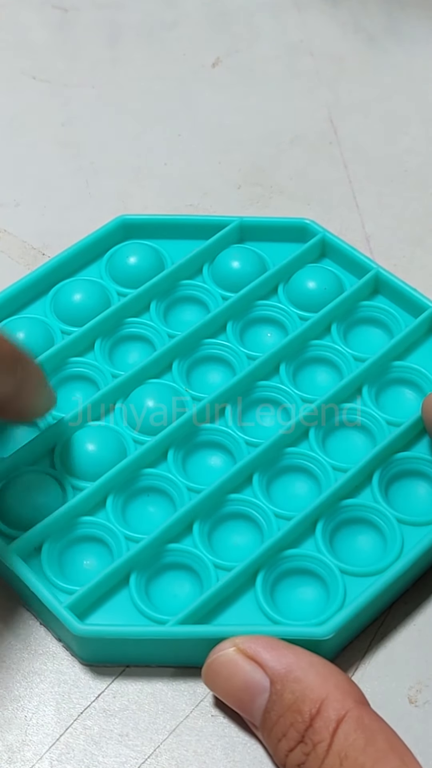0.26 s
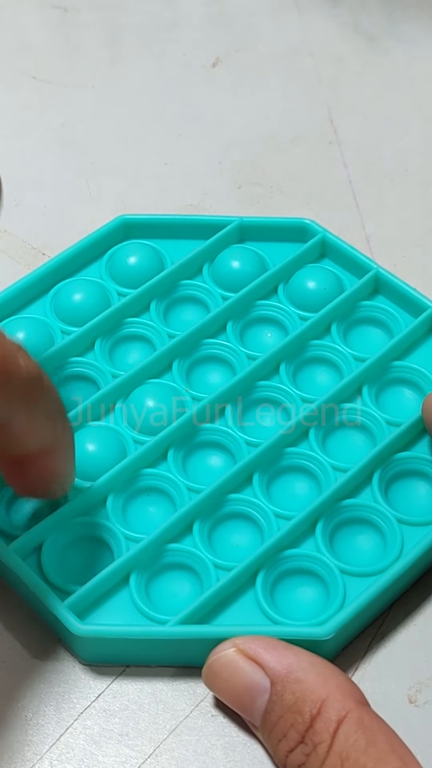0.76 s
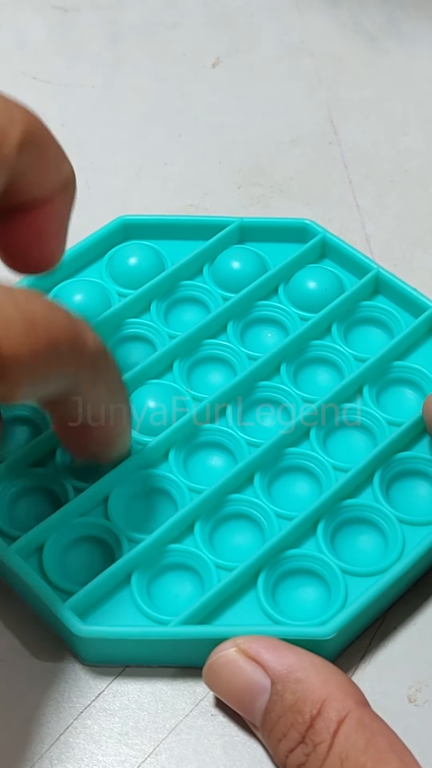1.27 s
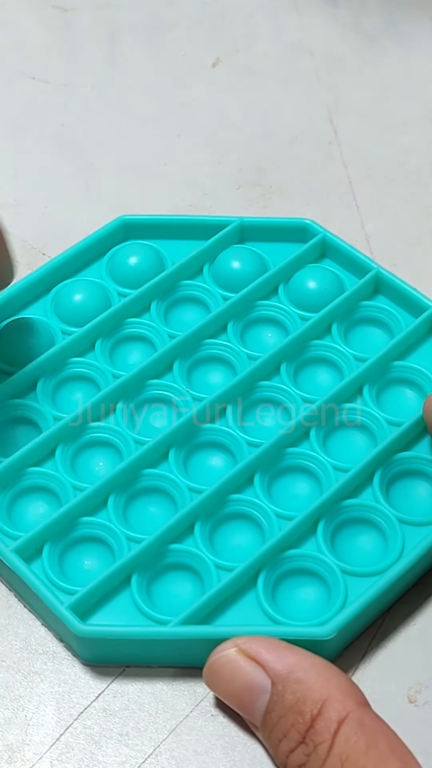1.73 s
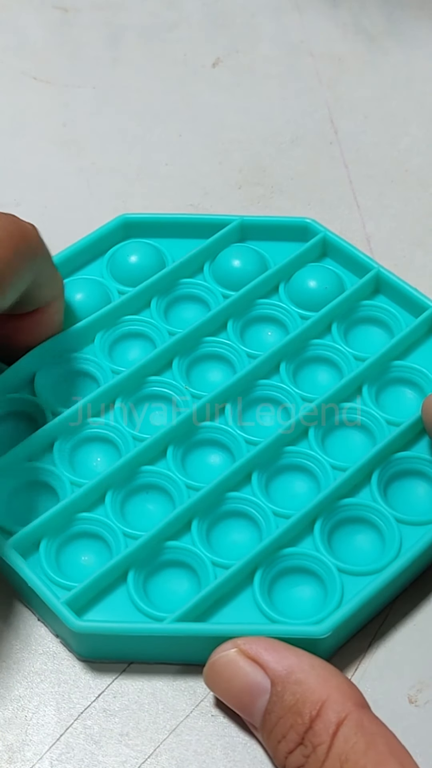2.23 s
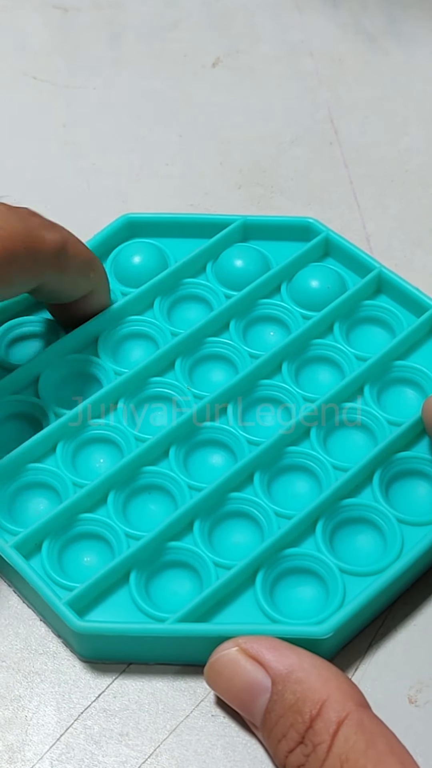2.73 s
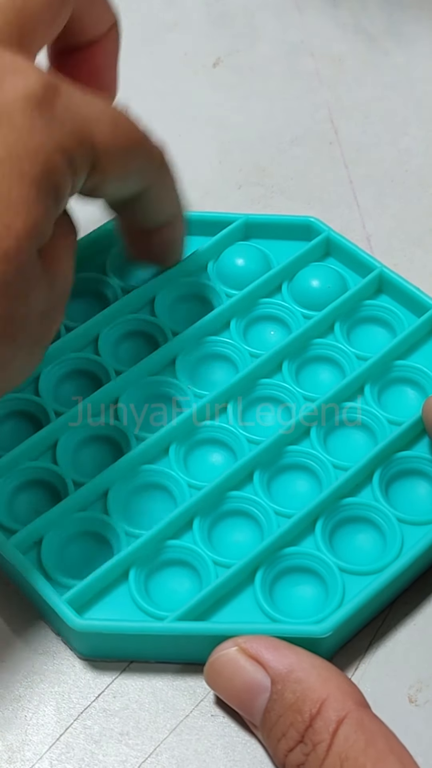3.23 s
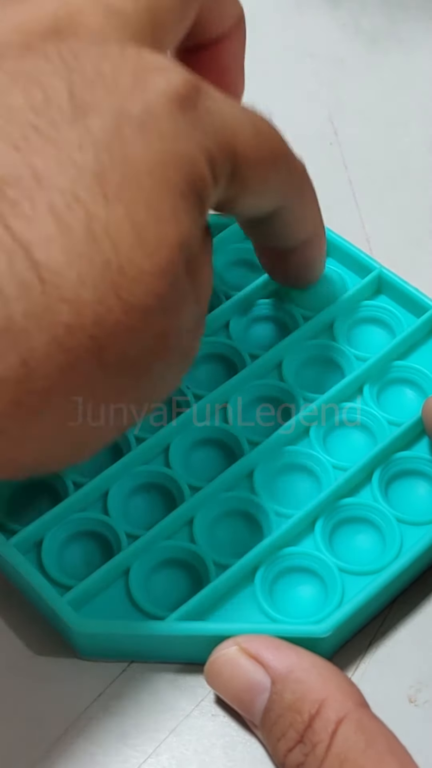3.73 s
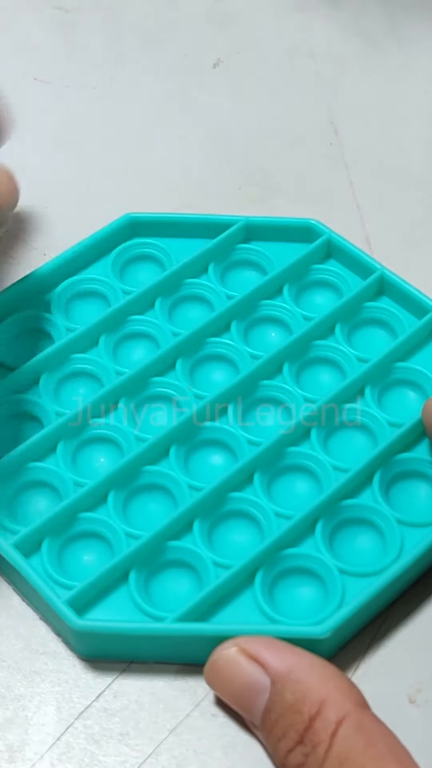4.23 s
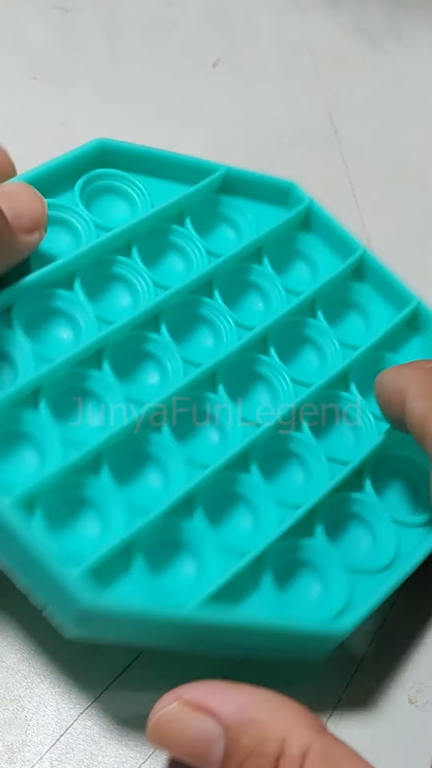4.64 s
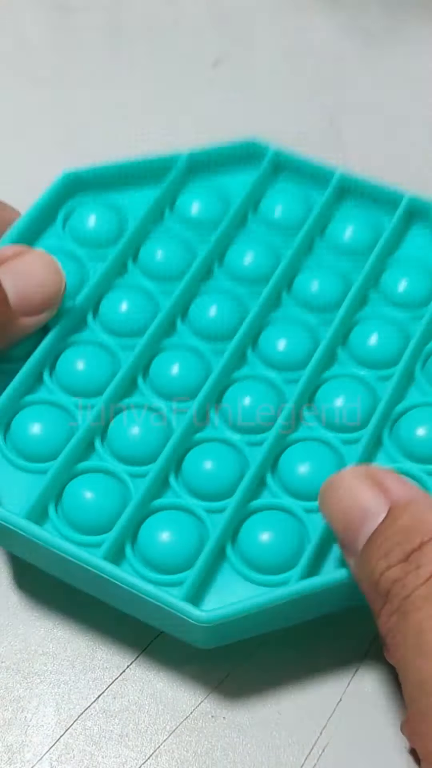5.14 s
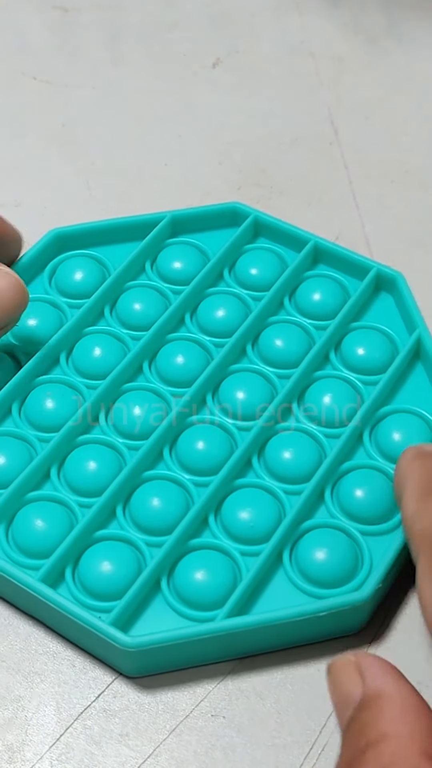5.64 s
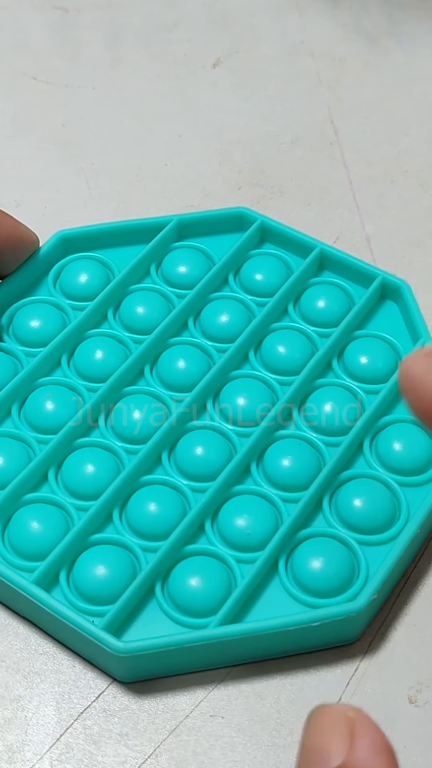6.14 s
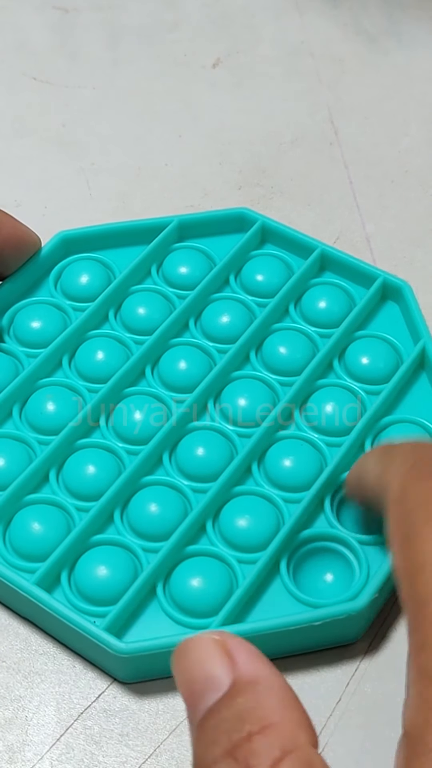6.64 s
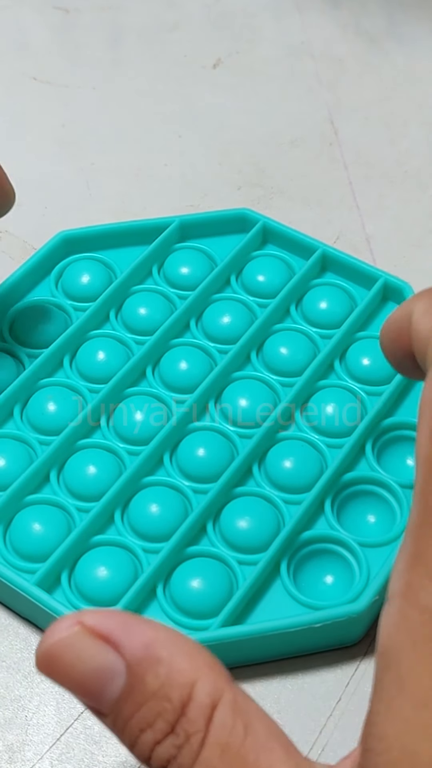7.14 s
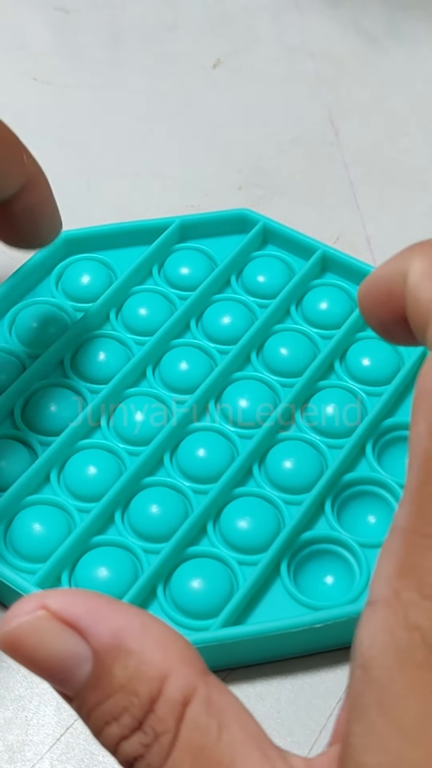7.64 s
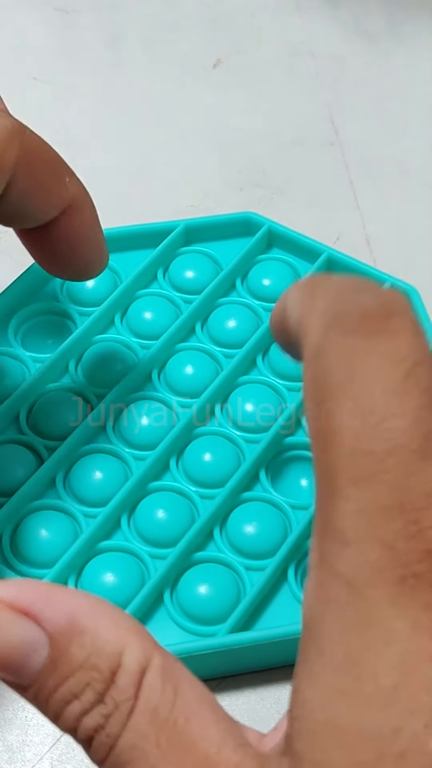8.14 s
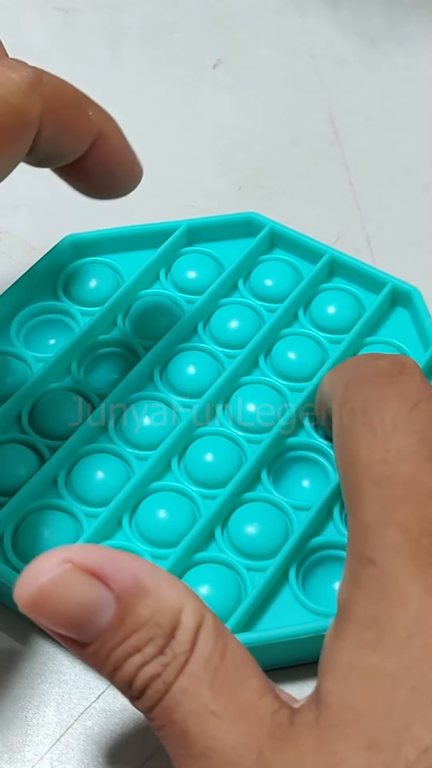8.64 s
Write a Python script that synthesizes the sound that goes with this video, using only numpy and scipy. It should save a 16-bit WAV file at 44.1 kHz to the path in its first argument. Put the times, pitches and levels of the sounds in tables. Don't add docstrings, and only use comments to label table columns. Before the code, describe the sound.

A silicone bubble mat is pressed close to a stereo microphone on a table in a small room. From 0.2 to 1.6 s come soft, hollow dome presses, the clearest near 0.26 and 0.57; more follow from 2.8 to 3.9, strongest at 2.8. At 4.56 the rubber peels off the table with a small rip, rustles and ticks at 4.8, then lands with a thud and clack at 5.63. Much louder pops begin at 6.49, then 6.8 and 7.04, each a hollow knock with a bright snap and brief rough ring. Weaker pops at 7.58 and 8.19 mix with firmer ones at 7.93, 8.36, 8.58 and 8.84. A palm rubs faintly around 7.1-7.6. Underneath, a low motor hum beats with an idling engine; faint traffic grows nearer after 6 s, with thin insect hiss, distant bird chirps and faint tyre whines.

```python
import sys
import numpy as np
from scipy import signal
from scipy.fft import rfft, irfft, next_fast_len
from scipy.io import wavfile
from scipy.ndimage import uniform_filter1d

SR = 44100
rng = np.random.default_rng(int(sys.argv[2]) if len(sys.argv) > 2 else 0)


def persist_wave(psi):
    counts = np.round(np.clip(psi, -1, 1) * 32767).astype(np.int16)
    wavfile.write(sys.argv[1], SR, np.atleast_2d(counts).T)


def natural_amplitude(level_db):
    exponent = np.asarray(level_db, float) / 20
    return 10 ** exponent


N = 392049
T = np.arange(N) / SR
FAR_SIDE_S = 7.3


def rms_one(x):
    return x / np.sqrt(np.mean(x ** 2) + 1e-20)


def in_time(rows):
    s, *columns = np.transpose(rows)
    return [np.interp(T, s, c) for c in columns]


def at_hz(points, hz):
    known_hz, value = np.transpose(points)
    return np.interp(np.log(hz), np.log(known_hz), value)


def drift(rate):
    return np.interp(T * rate, np.arange(400), 1.2 * rng.standard_normal(400))


def decay(t, t60):
    return natural_amplitude(-60 * t / np.clip(t60, .002, 2))


def add(out, s, burst):
    i = max(round(s * SR), 0)
    out[..., i:i + burst.shape[-1]] += burst[..., :N - i]


def resonance(x, hz, width_hz):
    r = np.exp(-np.pi * width_hz / SR)
    top = np.array([1, 0, -1]) * (1 - r * r) / 2
    return signal.lfilter(top, [1, -2 * r * np.cos(2 * np.pi * hz / SR), r * r], x)


def knock(out, s, db, hz, pan_db, rise_ms, t60):
    t = np.arange(-300, round(np.clip(t60, .002, .1) * SR)) / SR
    swell = np.exp(-np.log(2) * (1000 * t / max(rise_ms, .2)) ** 2)
    shape = np.where(t < 0, swell, decay(t, t60))
    share = 2 / (1 + natural_amplitude([[-pan_db], [pan_db]]))
    add(out, s + t[0], natural_amplitude(db) * share * shape * np.cos(2 * np.pi * hz * t + 2.53))


def rattle(rows, db, t60, low_hz, high_hz):
    out, t = np.zeros((2, N)), np.arange(3000) / SR
    creak_s = .004
    for row, (both, own) in zip(rows, rng.standard_normal((len(rows), 2, 3000))):
        shape = decay(np.maximum(t - creak_s, 0), t60) * np.minimum(t / creak_s, 1) ** 3
        ports = np.array([1.68 * both, 0.82 * both + .5 * own])
        add(out, row[0] - creak_s, natural_amplitude(row[1] + db) * shape * ports)
    band = signal.butter(4, [low_hz, high_hz], "band", fs=SR, output="sos")
    return signal.sosfilt(band, out + 1e-18)


def streak(hz, width_hz):
    knots = rng.standard_normal((2, 2, 3000))
    at = np.arange(len(hz)) * width_hz / SR
    slow = np.array([[np.interp(at, np.arange(3000), k) for k in pair] for pair in knots])
    turn = 2 * np.pi * np.cumsum(hz) / SR
    return rms_one(slow[0] * np.cos(turn) + slow[1] * np.sin(turn))


def streaks(rows):
    out = np.zeros((2, N))
    for s, length, from_hz, to_hz, width_hz, db in rows:
        hz = np.linspace(from_hz, to_hz, round(length * SR))
        shape = np.hanning(len(hz)) ** 0.17
        add(out, s, natural_amplitude(db + 1.0) * shape * streak(hz, 1.8 * width_hz) * natural_amplitude([[2.5], [-2.5]]))
    return out * natural_amplitude(2.5 * drift(30))


# (peak time [s], peak level [dB], pitch [Hz], left-right [dB])
PRESSES = [(0.1946, -50, 710, 8), (0.2636, -28, 940, 6), (0.4335, -41, 727, 2), (0.4498, -52, 680, 1),
           (0.5692, -28.5, 740, 4), (0.5865, -35.5, 600, 2), (0.9468, -47.5, 726, 9), (1.212, -49, 800, 8),
           (1.2507, -46, 770, 4), (1.5807, -35.5, 866, -2), (2.8347, -24.5, 780, 0), (2.855, -44, 820, 2),
           (3.2118, -30, 833, 0), (3.2485, -38, 776, -1), (3.4111, -48.5, 563, -4), (3.5691, -37, 632, 1),
           (3.76, -46.5, 530, 11), (3.9076, -43, 683, 3)]
# (peak time [s], peak level [dB], pitch [Hz], left-right [dB])
HANDLING = [
    (4.5597, -46, 890, 10),
    (4.8252, -39.5, 970, 14),
    (4.85, -56.5, 960, 3),
    (5.4588, -45, 540, 10),
    (5.6288, -20, 650, 5),
    (5.6305, -20, 940, 3),
]
# (peak time [s], peak level [dB], pitch [Hz], left-right [dB], ring to -60 dB [cycles])
FLIPS = [(6.463, -24.5, 730, -2, 7), (6.4865, -7, 944, -2, 15), (6.775, -33, 800, 6, 12),
         (6.7842, -24.5, 720, 4, 10), (6.7995, -7, 900, 2, 8), (7.0311, -19, 1080, 6, 8.5),
         (7.0362, -12, 1170, 5, 5.7), (7.0428, -14, 887, 0.5, 9.8), (7.5838, -28.5, 880, 4, 8.8),
         (7.9011, -24, 660, 1, 7.3), (7.9282, -19, 1050, 3.5, 6), (8.1852, -25, 813, 4, 8.5),
         (8.3557, -9, 860, -1.5, 4.6), (8.5452, -31, 860, -2, 13), (8.5798, -9.5, 1092, 3.5, 9),
         (8.7709, -20, 920, 2, 7), (8.7878, -26, 790, 0, 4.7), (8.8376, -8.5, 820, 3, 8)]
# (peak time [s], peak level [dB],
# pitch [Hz])
REBOUNDS = [(.2695, -40, 900), (6.4835, -26, 1300), (6.511, -27, 1100), (6.7715, -36, 850),
            (.625, -46, 750), (6.8565, -32, 750), (7.0285, -33, 900), (7.079, -34, 700),
            (7.9012, -30, 1000), (8.862, -27, 1000), (8.1862, -34, 480), (8.1853, -34, 1680),
            (8.8378, -27, 3100), (7.0425, -24, 4150), (6.7995, -27, 4800)]


def domes():
    out = rattle(PRESSES, -7.0, 0.05, 392, 1120) + rattle(HANDLING + FLIPS, -12.0, 0.035, 390, 1300)
    lying = [row + (8.2,) for row in PRESSES]
    held = [row + (5.0,) for row in HANDLING]
    for s, db, hz, pan_db, cycles in lying + held + FLIPS:
        rise_ms = 0.55 - 0.03 * db
        knock(out, s, db, hz, pan_db, rise_ms, cycles / hz)
    for s, db, hz in REBOUNDS:
        knock(out, s, db, hz, 2.0, 0.9, 5.0 / hz)
    return out


# (peak time [s], peak level [dB], pitch [Hz], left-right [dB])
CLACKS = [(2.8335, -49, 1520, 3), (3.2114, -43, 1900, 3), (3.2478, -50, 1900, 3), (4.56, -43, 1540, 11),
          (4.5652, -47, 2600, 9), (4.57, -41, 2300, 6), (5.6294, -27, 1400, 6), (5.64, -34, 1460, -3),
          (6.4867, -16, 1400, -12), (6.773, -46, 2600, -8), (6.7824, -26.5, 1600, -1),
          (6.7992, -17, 1480, -4), (7.0347, -21.5, 1480, 1), (7.0428, -15, 1570, -2),
          (7.9271, -14, 1840, 2), (8.1852, -42, 1680, -3), (8.2, -48, 1610, -5), (8.3556, -17, 1330, -3),
          (8.58, -18, 1390, 3), (8.7695, -44, 1580, -9), (8.8367, -12.5, 1475, 0)]


def clacks():
    out = rattle(CLACKS, -4.5, 0.032, 980, 2475) + rattle(CLACKS, -13.0, 0.024, 3400, 5400)
    for s, db, hz, pan_db in CLACKS:
        knock(out, s, db + 1.0, hz, pan_db, 0.36, 0.014 * (1500 / hz) ** 3.5)
    return out


# (time [s], peak level [dB])
THUDS = [(0.567, -37), (2.831, -48), (3.22, -47.5), (4.556, -52), (4.824, -48.5), (5.625, -28),
         (6.484, -37), (7.04, -31.5), (7.579, -34), (7.924, -43.5), (8.834, -46)]


def thuds():
    out = np.zeros((2, N))
    for s, db in THUDS:
        hz = 310 if s < FAR_SIDE_S else 470
        knock(out, s + 0.00416, db, hz, 2.5, 1.4, 0.034)
    return out


def nearer_left(x):
    lag_s = .00012
    return np.array([x[0], np.roll(x[1], round(lag_s * SR))])


# (peak time [s], peak level [dB], pitch [Hz])
PEELS = [(0.264, -41, 7060), (0.9493, -65, 5880), (1.579, -54, 5850), (2.8341, -56, 4950),
         (3.2134, -57, 5710), (4.5587, -35, 6200), (4.563, -37, 5600), (4.5675, -39, 5600),
         (5.6284, -31.5, 5930), (6.4605, -52, 7200), (6.4862, -22.5, 5540), (6.4945, -25, 5700),
         (6.7722, -52, 5220), (6.7827, -52, 5090), (6.799, -21.5, 5700), (7.034, -33, 6130),
         (7.042, -14, 5950), (7.9272, -23.5, 5700), (7.9346, -35, 5260), (8.184, -54, 6500),
         (8.3561, -23, 6400), (8.3627, -35, 6310), (8.5794, -23, 5250), (8.7692, -46, 6160),
         (8.8374, -13, 6050)]
# (pitch [Hz], width [Hz], level [dB])
PORTS = [
    [(5920, 1160, 1), (5060, 720, -1), (3520, 360, -4), (7750, 830, -33)],
    [(6500, 600, -14), (5200, 410, -12), (3500, 3600, -13), (8900, 930, -13.5)],
]


def snaps():
    ticks, crackle, t = np.zeros((2, N)), np.zeros((2, N)) + 1e-18, np.arange(2000) / SR
    grit = rng.standard_normal((len(PEELS), 2, 2000))
    for (s, db, hz), noise in zip(PEELS, grit):
        t60 = 0.0035 - 0.00011 * db
        rip = 4.5 < s < 4.6
        knock(ticks, s, db - 1.0 - 9 * rip, hz, 15, 0.27, 1.25 * t60)
        held_s = .005 * rip
        shape = decay(np.maximum(t - held_s, 0), 2.3 * t60) * np.minimum(t / 0.00046, 1)
        add(crackle, s - .0008, natural_amplitude(db + 10.0) * noise * shape)
    ported = []
    for side, port in zip(crackle, PORTS):
        peaks = [natural_amplitude(db) * resonance(resonance(side, hz, width), hz, width) for hz, width, db in port]
        ported.append(sum(peaks))
    return ticks + ported


# (time
# [s], pitch [Hz], width [Hz], level [dB], length [s])
LINGERINGS = [(.264, 1050, 1000, -52, .055), (.434, 730, 350, -62, .04), (.569, 620, 620, -43, .075),
              (.569, 1700, 1400, -66, .012), (1.581, 780, 400, -57, .035), (2.835, 700, 750, -45, .06),
              (2.835, 1600, 1400, -59, .025), (3.212, 720, 700, -48, .065), (3.212, 1700, 1500, -57, .04),
              (3.567, 720, 600, -55, .035), (4.562, 800, 800, -58, .03), (4.562, 1600, 800, -54, .07),
              (4.825, 900, 500, -57, .045), (5.629, 550, 800, -39, .085), (5.629, 1550, 1400, -45, .07),
              (6.459, 800, 700, -42, .03), (6.487, 440, 210, -41, .09), (6.487, 930, 600, -31, .12),
              (6.487, 1450, 500, -38, .11), (6.8, 820, 510, -37, .115), (6.8, 1400, 800, -42, .1),
              (7.043, 450, 220, -43, .065), (7.043, 760, 360, -39, .115), (7.043, 1400, 800, -39, .1),
              (7.584, 560, 450, -43, .085), (7.584, 950, 500, -49, .045), (7.901, 550, 360, -40, .03),
              (7.901, 980, 280, -44, .03), (7.928, 680, 750, -43, .055), (7.928, 1850, 700, -40, .09),
              (8.185, 880, 500, -44, .135), (8.195, 1620, 600, -55, .07), (8.356, 800, 400, -37, .1),
              (8.356, 1250, 700, -36, .085), (8.545, 860, 350, -52, .04), (8.58, 1200, 1000, -36, .11),
              (8.58, 700, 300, -45, .1), (8.771, 850, 1000, -38, .055), (8.838, 730, 400, -32, .08),
              (8.838, 1350, 900, -34, .08),
              (.264, 6600, 1600, -63, .06), (2.835, 3800, 500, -71, .06), (4.562, 2530, 1000, -54, .07),
          (4.562, 5600, 2200, -46, .085), (4.562, 4000, 800, -54, .08), (5.629, 5300, 2400, -52, .07),
          (5.625, 7900, 1400, -62, .06), (5.629, 3200, 2200, -54, .06), (6.487, 5500, 2000, -42, .08),
          (6.487, 2700, 1200, -52, .05), (6.8, 5600, 2200, -46, .07), (6.8, 3900, 1000, -52, .065),
          (6.8, 2500, 700, -54, .06), (7.043, 4190, 1200, -47, .06), (7.043, 5900, 1600, -46, .085),
          (7.043, 2400, 700, -52, .05), (7.928, 2350, 600, -44, .05), (7.928, 5900, 1640, -45, .07),
          (7.928, 3900, 1400, -53, .05), (8.356, 2250, 600, -50, .055), (8.356, 3950, 750, -51, .06),
          (8.356, 6400, 1500, -43, .09), (8.58, 2600, 1400, -49, .045), (8.58, 5400, 2600, -46, .065),
          (8.771, 6200, 1400, -60, .045), (8.838, 6100, 1500, -42, .08), (8.838, 3200, 1900, -43, .08),
              (.94, 680, 350, -61, .03),
    (1.21, 760, 500, -61, .022),
    (1.249, 770, 400, -58, .028),
    (3.408, 600, 350, -62, .025),
    (3.758, 780, 700, -59, .022),
    (3.905, 740, 450, -57, .03),
    (5.457, 750, 800, -60, .02),
]
# (frequency [Hz], left-right [dB])
PORT_LEAN = [(2000, 2.5), (5800, 10), (8200, -5)]


def linger():
    out, bins_hz = np.zeros((2, N)), np.fft.rfftfreq(8192, 1 / SR)
    for s, hz, width_hz, db, length in LINGERINGS:
        t = np.arange(round((length + .04) * SR)) / SR
        white = rfft(rng.standard_normal((2, 8192)))
        off = 2 * (bins_hz - hz) / width_hz
        wide = rms_one(irfft(white * np.exp(-.5 * off ** 4)))[:, :len(t)]
        core = rms_one(irfft(white * np.exp(-.5 * ((off + .3) / .62) ** 4)))[:, :len(t)]
        aged = np.minimum(t / length, 1)
        left, right = (1 - aged) * wide + aged * core
        alike = np.clip(0.85 - hz / 4000, 0, 1)
        ports = [left, alike * left + np.sqrt(1 - alike ** 2) * right]
        share = natural_amplitude(at_hz(PORT_LEAN, hz) / 2 * np.array([[1], [-1]]))
        share = share / np.sqrt(np.mean(share ** 2))
        shape = np.minimum(t / .005, 1) * decay(t, .26) * decay(np.maximum(t - length, 0), .05)
        add(out, s, natural_amplitude(db + 1.5) * shape * ports * share)
    return out


# (time [s], level [dB], spacing [Hz])
SLIDE = [
    (7.05, -79, 469),
    (7.18, -62.5, 462),
    (7.35, -61.5, 469.4),
    (7.52, -59.5, 472),
    (7.62, -87, 485),
]
# (multiple of spacing, width [Hz], level [dB])
SLIDE_RIDGES = [(1, 57, 1.5), (2, 170, -8), (3, 170, -8), (4, 150, -11.5), (5, 150, -13)]


def slide():
    out, start, end = np.zeros((2, N)), round(SLIDE[0][0] * SR), round(SLIDE[-1][0] * SR)
    db, spacing_hz = [c[start:end] for c in in_time(SLIDE)]
    ridges = sum(natural_amplitude(d) * streak(k * spacing_hz, width) for k, width, d in SLIDE_RIDGES)
    add(out, SLIDE[0][0], natural_amplitude(db) * ridges)
    return out


# (time [s], length [s], pitch [Hz], width [Hz], level [dB])
TURNING = [(4.763, .016, 5400, 600, -70), (4.518, .035, 5200, 450, -73), (4.78, .09, 5350, 450, -77),
           (4.83, .065, 6250, 250, -74), (4.89, .03, 6180, 400, -66), (4.933, .03, 6300, 350, -71),
           (4.943, .02, 4550, 400, -69), (5.017, .03, 5850, 400, -68), (5.197, .025, 5600, 700, -71),
           (5.0, .3, 7800, 450, -77)]


def turning():
    return streaks([(s, length, hz, hz, width, db) for s, length, hz, width, db in TURNING])


# (band centre [Hz], fall by 60 dB [s], level [dB])
ROOM = [(264, 0.22, -31), (540, 0.21, -38), (1080, 0.3, -45), (2050, 0.26, -46), (4300, 0.3, -44),
        (7900, 0.4, -48)]
# (delay [s], level [dB])
ECHOES = [
    (.0065, -26),
    (.013, -25),
    (.025, -28),
]


def room(x):
    t, noise = np.arange(SR // 4) / SR, rng.standard_normal((len(ROOM), 2, SR // 4))
    noise[:2, 1] = 0.69 * noise[:2, 0] + 0.74 * noise[:2, 1]
    tail = 0
    for (hz, t60, db), white in zip(ROOM, noise):
        octave = signal.butter(2, [hz / 2 ** .5, hz * 2 ** .5], "band", fs=SR, output="sos")
        gate_s = 0.105 * (1000 / hz) ** .25
        shape = decay(t, t60) * decay(np.maximum(t - gate_s, 0), 7.2 * 0.035)
        tail = tail + natural_amplitude(db) * signal.sosfilt(octave, white) * shape
    tail = tail * np.minimum(t / 0.0013, 1)
    for s, db in ECHOES:
        tail[:, round(s * SR)] += natural_amplitude(db)
    return signal.oaconvolve(x, tail, axes=1)[:, :N]


def hum(rows, orders, wobble_db):
    hz, db = in_time(rows)
    turn = 2 * np.pi * np.cumsum(hz) / SR
    out = 0
    for k, d in orders:
        level = natural_amplitude(db + 2 + d + wobble_db * drift(2.925))
        out = out + level * np.sin(k * turn + rng.uniform(0, 5.94))
    return out


# (time [s], level [dB])
MOTOR = [
    (0, -49),
    (.6, -43.5),
    (1.2, -54.5),
    (1.9, -46.5),
    (8.89, -46.5),
]
# (multiple of 57.9 Hz, level [dB])
MOTOR_ORDERS = [(1, -2), (1.5, -20), (2, -25.5), (3, -24), (5, -24), (7.5, -29)]


def motor():
    return hum([(s, 57.9, db) for s, db in MOTOR], MOTOR_ORDERS, 0.78)


# (time [s], firing rate [Hz], level [dB])
IDLER = [
    (0, 66.3, -56),
    (1.2, 66.2, -57.5),
    (2.5, 65.8, -58),
    (3.6, 66.2, -54.5),
    (4.6, 66.7, -48.5),
    (5.8, 67.2, -51),
    (7, 67.9, -44),
    (8.1, 68.2, -43.5),
    (8.89, 68.5, -46),
]
# (multiple of firing rate, level [dB])
IDLER_ORDERS = [(.25, -8.5), (.75, -20.5), (1, -2.5), (1.25, -15.5), (1.5, -19)]


def idling_engine():
    return hum(IDLER, IDLER_ORDERS, .9)


# (time [s], pitch [Hz], level [dB])
PASSERS = [
    [(2, 139.8, -82), (2.6, 133.9, -66.5), (3.4, 129.2, -62), (4.3, 119.5, -69.5), (5.2, 114.1, -65),
     (5.6, 111, -91)],
    [(2, 109.6, -73), (2.6, 107, -62), (3.5, 100.9, -50), (4.3, 94, -76), (4.8, 91, -72)],
    [(4.6, 128.5, -82), (5.2, 124.7, -62), (6.2, 111.6, -73), (6.6, 112, -82)],
    [(6.6, 120, -85), (7.2, 122, -66), (8, 126.1, -61), (8.5, 131, -80)],
]


def passing_engines():
    return sum(hum(rows, [(0.99, 0.013)], 2.5) for rows in PASSERS)


# (frequency [Hz], left-right likeness [-1 to 1])
LIKENESS = [(60, 0.72), (180, 0.9), (550, 0.53), (1650, -0.084), (4970, 0.029), (15000, -0.03)]
# (frequency [Hz], left-right [dB])
LEAN = [(60, 4.5), (180, 0), (550, 1), (1650, 1), (4970, 3), (15000, -2)]


def far_noise(spectrum, level_db, patchy_db):
    size = next_fast_len(N)
    hz = np.maximum(np.fft.rfftfreq(size, 1 / SR), 1)
    mid, side = rfft(rng.standard_normal((2, size)))
    alike, lean = np.clip(at_hz(LIKENESS, hz), -1, 1), natural_amplitude(at_hz(LEAN, hz) / 2)
    colour = natural_amplitude(at_hz(spectrum, hz)) * (hz > spectrum[0][0]) * (hz < spectrum[-1][0])
    mid = colour * np.sqrt(1 + alike) * mid
    side = colour * np.sqrt(1 - alike) * side
    pair = irfft(np.array([(mid + side) * lean, (mid - side) / lean]), size)[:, :N]
    return rms_one(pair) * natural_amplitude(level_db + patchy_db * drift(8.3))


# (time [s], level [dB])
TRAFFIC = [
    (0, -69.5),
    (1.14, -69),
    (1.86, -71.5),
    (2.89, -72),
    (4.33, -76),
    (5.49, -72.5),
    (6.24, -69.5),
    (6.96, -62),
    (8.2, -62),
    (8.89, -58),
]
# (time [s], length [s], level [dB])
BRUSHES = [
    (4.5, 1.1, -78),
    (5.4, 2.7, -75),
    (8.6, .6, -74),
]
# (frequency [Hz], level per Hz [dB])
RUMBLE = [(7.1, -31), (12, -1.5), (43, 0), (66, -4), (84, -4), (108, -10.5), (214, -20.5), (240, -27.5),
          (310, -38), (530, -120)]
# (frequency [Hz], level per Hz [dB])
STREET = [(130, -43.5), (220, -3.5), (312, -0.5), (478, -8.5), (576, -10.5), (1660, -16.5), (1850, -18),
          (3000, -25.5), (3900, -40), (6600, -120)]
# (frequency [Hz], level per Hz [dB])
HISS = [(1650, -25), (2800, -13.5), (4560, -4.5), (4980, -8.5), (5510, -3.5), (7070, -3), (9550, -3.5),
        (9980, -14), (12000, -17), (14200, -33)]


def street():
    street_db, = in_time(TRAFFIC)
    swing_db = street_db - street_db.mean()
    brushed = np.zeros(N) + natural_amplitude(-77)
    for s, length, db in BRUSHES:
        add(brushed, s, natural_amplitude(db) * np.hanning(round(length * SR)) ** .9)
    hiss_db = 20 * np.log10(brushed) + .4 * swing_db
    rumble = far_noise(RUMBLE, -57.5 + .35 * swing_db + 6.5, 1.48)
    return rumble + far_noise(STREET, street_db + 3.5, 1.08) + far_noise(HISS, hiss_db + 2.0, 0.62)


# (time [s], length [s], low edge [Hz], high edge [Hz], share of time heard)
AIRINGS = [(0, 1.25, 14200, 15000, .55), (1.25, 1.35, 14200, 15000, .95), (0, 2.8, 15000, 15750, .3),
           (3.2, 2.1, 14200, 15000, .9), (3.6, 1.1, 15000, 15750, .4), (4.7, .95, 15000, 15750, .95),
           (5.65, .8, 14600, 15750, .35), (6.52, .7, 12800, 13500, .9), (6.75, 1.17, 13500, 15000, .9),
           (8.3, .27, 14200, 15500, .8), (8.68, .21, 13500, 14800, .6)]


def insects():
    out = np.zeros((2, N))
    for s, length, low_hz, high_hz, heard in AIRINGS:
        size = round(length * SR)
        hz = np.fft.rfftfreq(size, 1 / SR)
        white = rfft(rng.standard_normal((2, size)))
        band = rms_one(irfft(white * (hz > low_hz) * (hz < high_hz), size))
        flicker = drift(30)[:size]
        gate = uniform_filter1d(1.0 * (flicker < np.quantile(flicker, heard)), size=300)
        level = natural_amplitude(-82 + 4 * (s > FAR_SIDE_S - 1))
        add(out, s, level * gate * np.hanning(size) ** .1 * band)
    return out


# (frequency [Hz], depth [dB])
PATCHES = [(300, 0.5), (2500, 4), (6500, 5.5), (8000, 10), (10500, 23.5), (16000, 6)]


def suppress(x):
    hz, _, cells = signal.stft(x, SR, nperseg=512)
    field = rng.standard_normal(cells.shape[1:])
    field = rms_one(uniform_filter1d(uniform_filter1d(field, size=2, axis=0), size=10, axis=1))
    gain = natural_amplitude(at_hz(PATCHES, np.maximum(hz, 1))[:, None] * np.tanh(1.4 * (field - .3)))
    gain = gain / np.sqrt(np.mean(gain ** 2, axis=1, keepdims=True))
    return signal.istft(cells * gain, SR, nperseg=512)[1][:, :N]


# (time [s], length [s], start pitch [Hz], end pitch
# [Hz], level [dB])
BIRDS = [
    (0, .46, 3860, 3820, -79),
    (2.42, .1, 3480, 3550, -86),
    (2.52, .075, 3550, 3750, -80),
    (2.65, .1, 3870, 3750, -81),
    (2.66, .14, 3500, 3270, -81),
    (2.84, .14, 3780, 3860, -83),
    (0, .14, 2950, 2950, -82),
    (6.8, .25, 2750, 2500, -70),
]


def birds():
    return streaks([(s, length, a, b, 90, db) for s, length, a, b, db in BIRDS])


# (time [s], length [s], pitch [Hz], level [dB])
WHINES = [(6.12, .58, 3430, -77), (6.1, .7, 7200, -75), (8.12, .23, 2050, -72), (8.42, .41, 3680, -72),
          (8.6, .2, 6100, -73), (8.36, .21, 4750, -73), (5.56, .5, 4050, -83), (5.85, .42, 4950, -82),
          (8.08, .28, 1640, -70), (6.75, 1, 5020, -74), (6.8, .95, 6320, -73), (6.75, 1, 7150, -71)]


def whines():
    return streaks([(s, length, hz, hz, .033 * hz, db) for s, length, hz, db in WHINES])


def scene():
    toy = nearer_left(domes() + clacks() + thuds()) + snaps()
    port_top = signal.butter(6, 8900, fs=SR, output="sos")
    toy = signal.sosfilt(port_top, toy + 1e-18)
    mat = linger() + slide() + turning()
    engines = (motor() + idling_engine() + passing_engines()) * natural_amplitude([[.7], [-.7]])
    return toy + room(toy) + mat + engines + suppress(street() + insects()) + birds() + whines()


def top_cut(x):
    return signal.sosfilt(signal.butter(12, 16670, fs=SR, output="sos"), x)


def record(dry):
    return top_cut(dry)


dry = scene()
out = record(dry)
persist_wave(out)
```